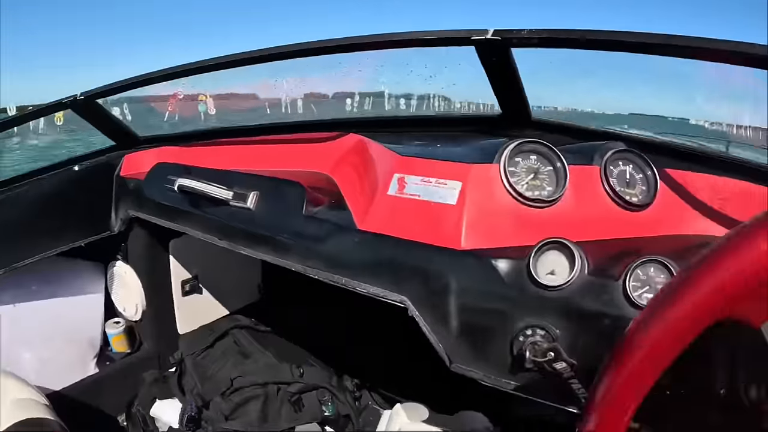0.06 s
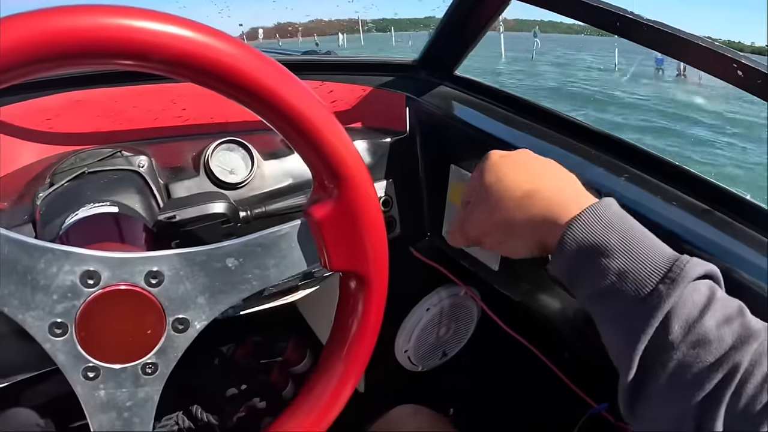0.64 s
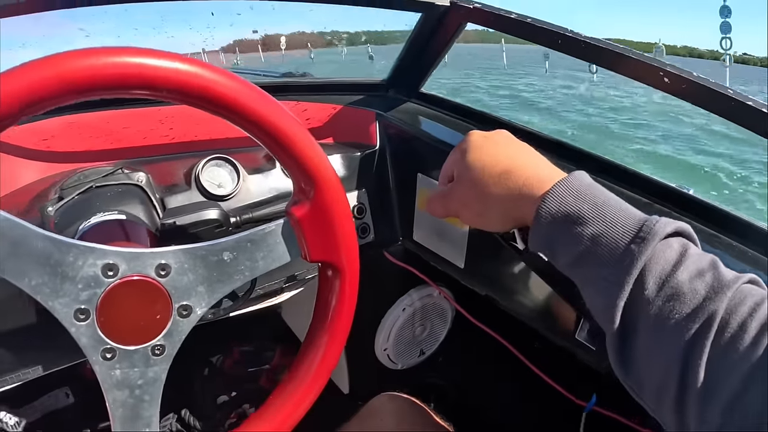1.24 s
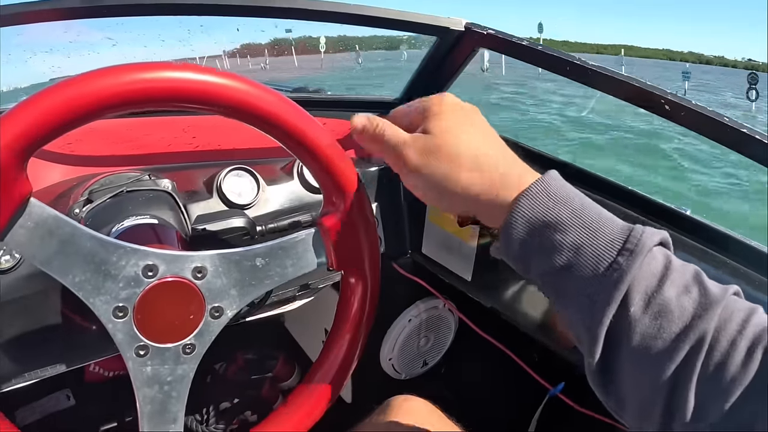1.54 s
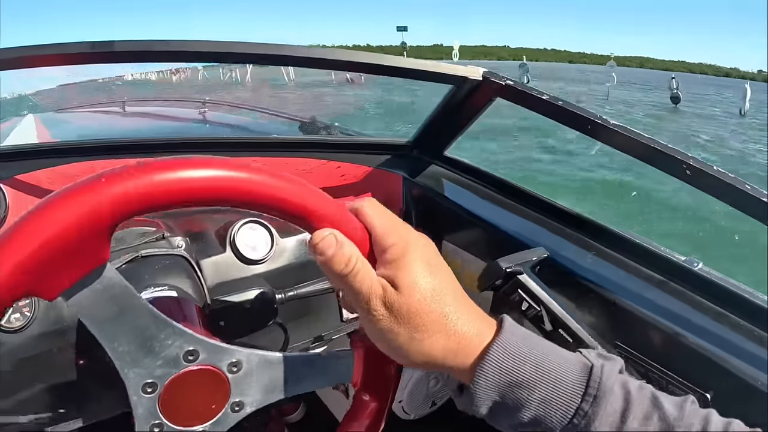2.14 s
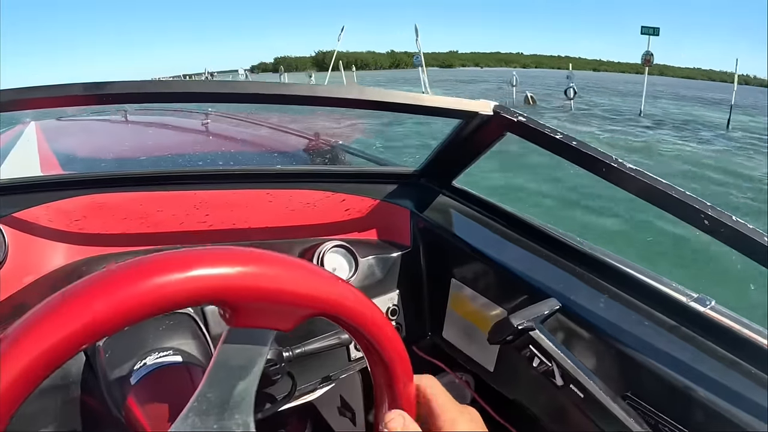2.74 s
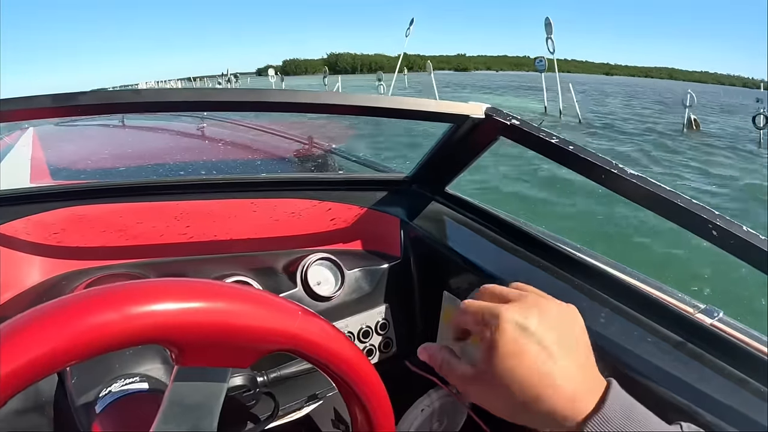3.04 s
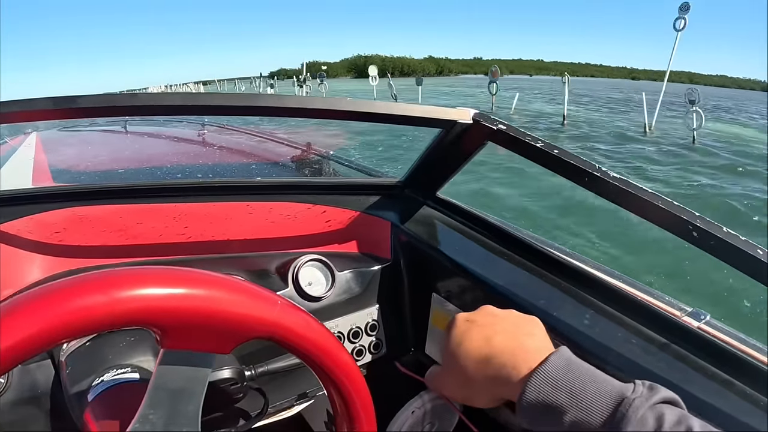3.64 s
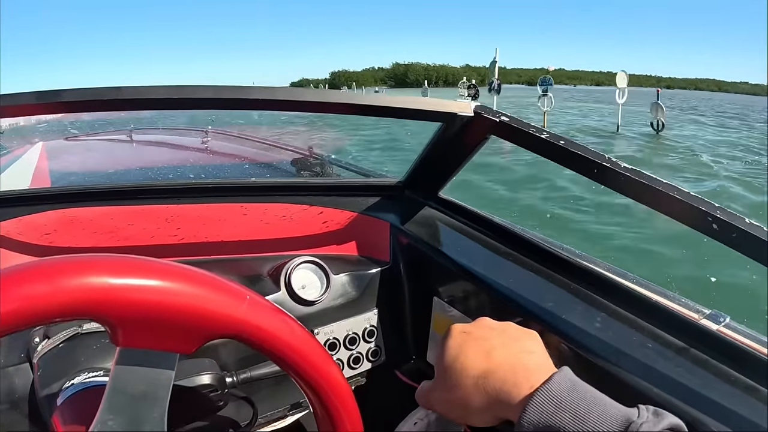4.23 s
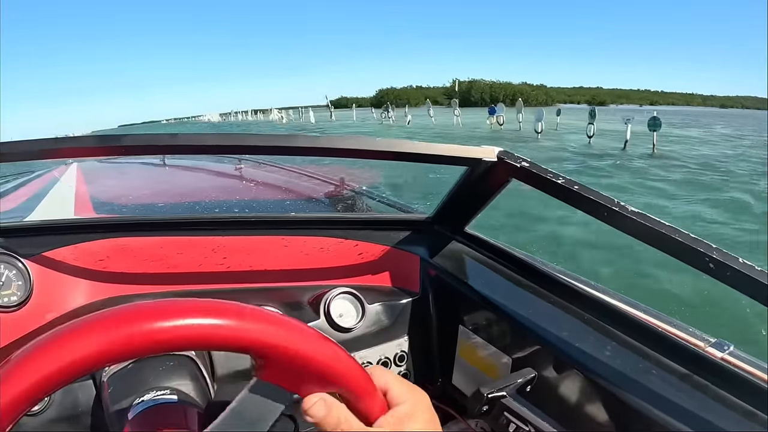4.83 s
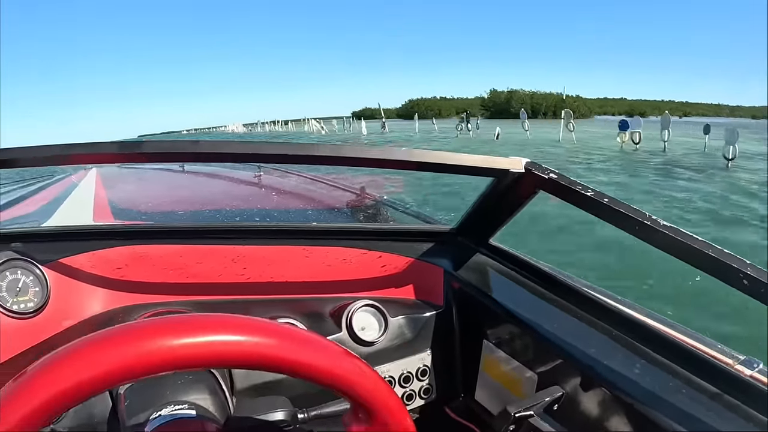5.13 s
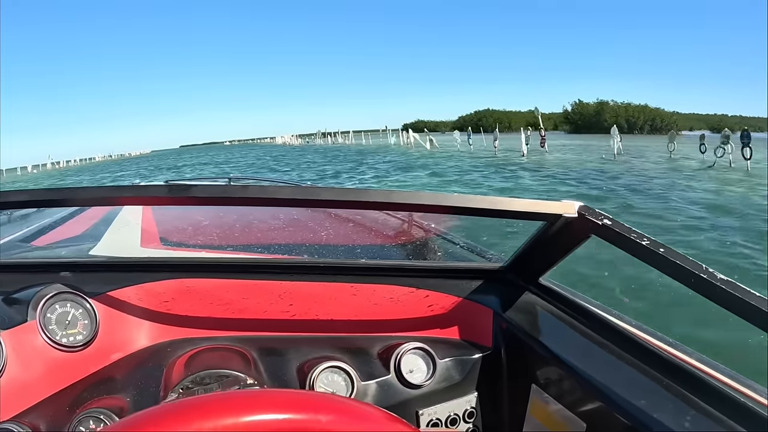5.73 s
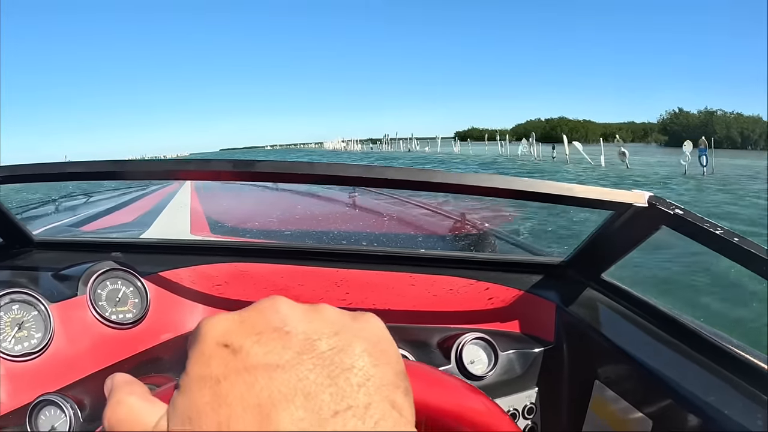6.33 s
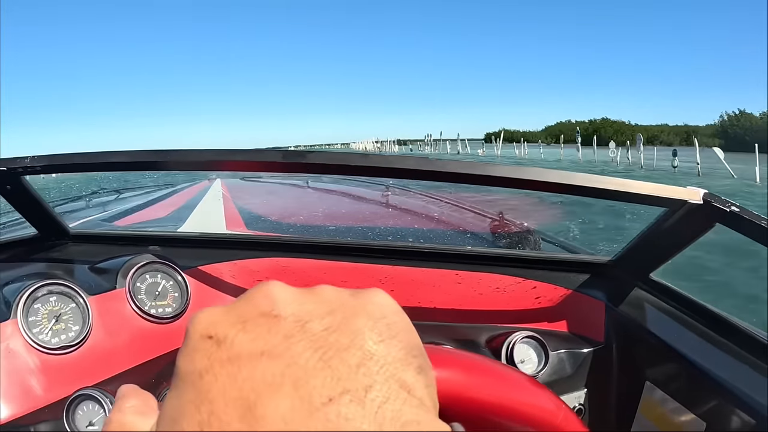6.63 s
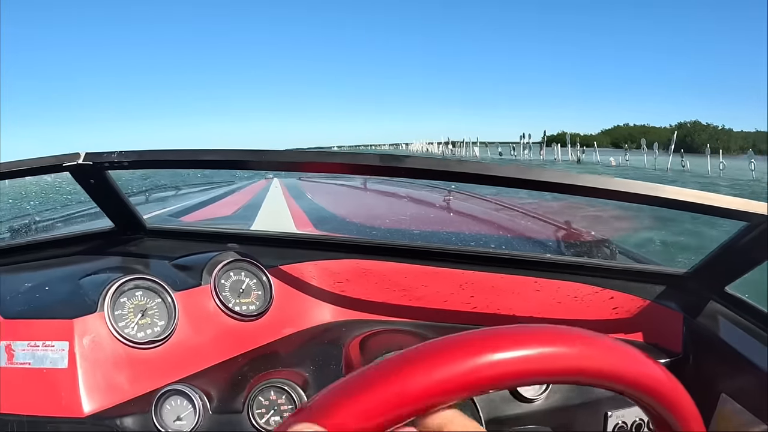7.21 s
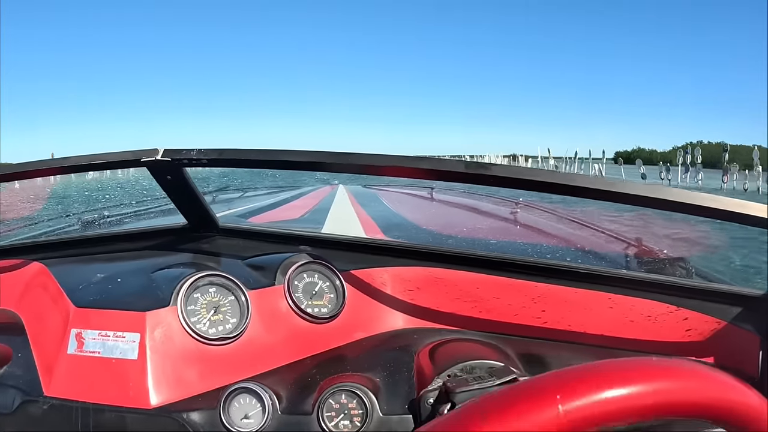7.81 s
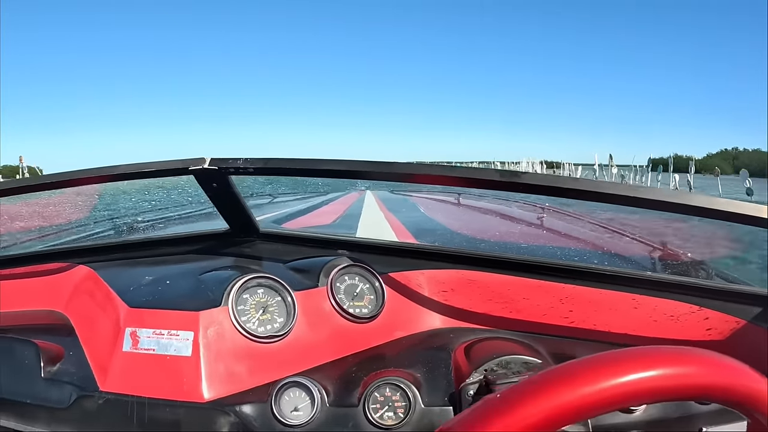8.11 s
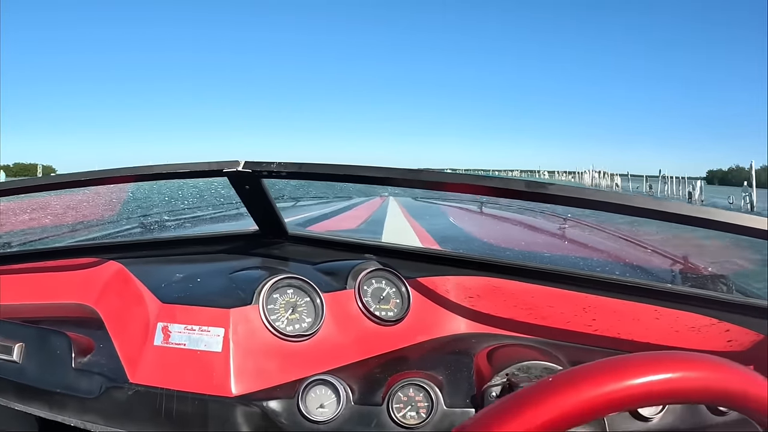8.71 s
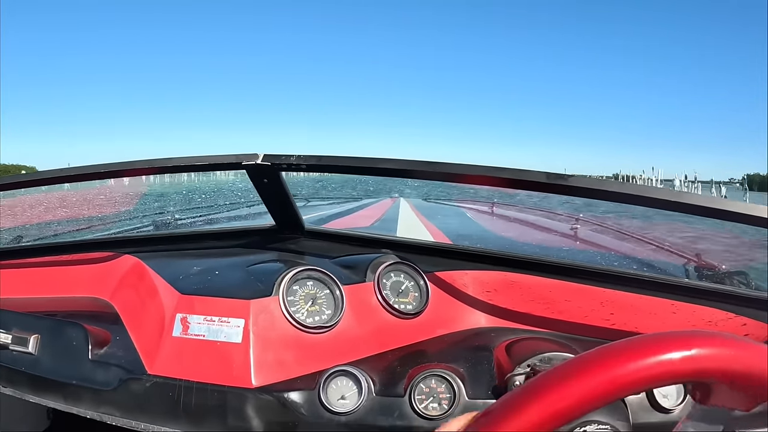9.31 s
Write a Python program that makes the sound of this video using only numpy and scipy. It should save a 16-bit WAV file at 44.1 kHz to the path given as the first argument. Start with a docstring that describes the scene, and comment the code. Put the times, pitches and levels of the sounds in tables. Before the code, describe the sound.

A small speedboat's outboard motor drones, revs briefly, then speeds up as wind buffets the microphone and the hull thumps through splashing waves.

```python
"""At the helm of a small speedboat. From the start the outboard motor drones astern, water rushes along
the hull and throws spray, and wind rumbles on the microphone. Near 1 s the motor is revved briefly;
from 2 s a thin sizzle comes and goes. At about 3.5 s and 4.2 s the throttle opens in two steps.
From 5.4 s steep waves knock on the hull and the wind tears at the microphone in short, crackling buffets.
The boat starts to plane (skim the water), and after 7 s its bow thumps into troughs amid splashes."""
import sys
import numpy as np
from scipy import signal
from scipy.io import wavfile
from scipy.ndimage import uniform_filter1d, minimum_filter1d

SR = 44100
rng = np.random.default_rng(int(sys.argv[2]) if len(sys.argv) > 2 else 0)


def log_audio(samples):
    """Write samples as a 16-bit WAV file to the path given in sys.argv[1]."""
    # one column per channel
    frames = np.atleast_2d(samples).T
    # limit to full scale, then quantise
    limited = np.clip(frames, -1, 1)
    pcm = np.round(limited * 32767).astype(np.int16)
    wavfile.write(sys.argv[1], SR, pcm)


N = 412776
TIME = np.arange(N) / SR
CRUISE_TURNS_PER_S = 56.45   # motor speed at the start
PLANING_S, HULL_NOTE_HZ = 5.69, 178

# loudness of the exhaust drone: time_s, level_db
DRONE_LEVELS = [(0.05, -14.5), (0.28, -14.5), (0.92, -14.5), (1.08, -18.5), (1.34, -13), (1.52, -15),
                (2.11, -13), (2.93, -16.5), (4.25, -15), (4.3, -14), (5.2, -15), (5.92, -19.5), (6.57, -17),
                (9.3, -21)]
# tone colour of fine drops: pitch_hz, level_db
DROP_SPECTRUM = [(3000, -2.5), (4500, 1), (5900, -1), (6800, -6), (8100, -9), (8900, -20), (10000, -16.5),
                 (11200, -25), (14000, -38)]


def from_db(db):
    """Turn decibels into a gain."""
    return 10 ** (np.asarray(db) / 20)


def unit_power(x):
    """Scale a signal to an average power of 1."""
    return x / np.sqrt(np.mean(x ** 2) + 1e-20)


def in_time(points):
    """Read a curve of (time, value) points at every sample."""
    return np.interp(TIME, *np.transpose(points))


def at_hz(spectrum, hz):
    """Read a spectrum's level at a pitch, sliding between its points on a musical scale."""
    pitches, levels = np.transpose(spectrum)
    return np.interp(np.log(hz), np.log(pitches), levels)


def drift(rate_hz):
    """A smooth random wander, typically about 1 in size."""
    step, warm_up = 40, 2000
    pole = np.exp(-2 * np.pi * rate_hz * step / SR)
    noise = rng.standard_normal(N // step + warm_up + 2)
    slow = signal.lfilter([1], [1, -2 * pole, pole * pole], noise)[warm_up:]
    return np.interp(np.arange(N) / step, np.arange(len(slow)), unit_power(slow))


def hiss():
    """White noise."""
    return rng.standard_normal(N)


def grainy_hiss(share, per_s, spread_db):
    """Hiss mixed with random tiny impacts, mostly small and a few large."""
    sizes = from_db(spread_db * np.minimum(rng.exponential(1, N), 4))
    hits = rng.random(N) < per_s / SR
    return hiss() + share * unit_power(hits * sizes * rng.choice([-1, 1], N))


def coloured(source, spectrum, flicker_db):
    """Shape noise to a spectrum with 14 bands, each flickering on its own; the result has power 1."""
    edges = np.geomspace(spectrum[0][0], min(spectrum[-1][0], .45 * SR), 15)
    noises, out = [source(), source()], 0
    for k, (low, high) in enumerate(zip(edges, edges[1:])):
        band = signal.sosfilt(signal.butter(2, [low, high], "band", fs=SR, output="sos"), noises[k % 2])
        out += band * from_db(at_hz(spectrum, np.sqrt(low * high)) + flicker_db * drift(30))
    return unit_power(out)


def tone(angle, level_db, shake_db, shake_hz):
    """One tone of the motor; it trembles because the fuel burns unevenly."""
    return np.sqrt(2) * from_db(level_db + shake_db * drift(shake_hz)) * np.cos(angle)


def swells(events, rise_s, fall_s):
    """A loudness curve that rises quickly at each (time, level) event and falls away."""
    out = np.zeros(N)
    for time_s, level_db in events:
        age = np.maximum(TIME - time_s + rise_s / 2, 0)
        out += from_db(level_db) * (1 - np.exp(-age / rise_s)) * np.exp(-age / fall_s)
    return out


def cockpit(x):
    """Hard panels close by add very short echoes that colour the sound."""
    # windscreen, side panel and dashboard: delay_s, gain
    echoes = [(.0029, .13), (.0047, -.13), (.0083, .14)]
    return x + sum(gain * np.interp(TIME - delay_s, TIME, x, left=0) for delay_s, gain in echoes)


def motor_speed():
    """Turns per second: the motor glides to each new speed, then creeps faster as the hull planes."""
    # changes in motor pitch (the rev, two steps up, small rises and sags):
    # start_s, target_turns_per_s, lag_s
    pitch_changes = [(0.1, 56.95, 0.03), (0.36, 56.1, 0.04), (0.775, 79.081, 0.061), (1.149, 59.867, 0.086),
                     (1.652, 58.144, 0.097), (2.274, 56.15, 0.113), (3.12, 55.6, 0.04),
                     (3.462, 63.288, 0.064), (4.183, 71.813, 0.068)]
    speed = CRUISE_TURNS_PER_S + .578 * np.maximum(TIME - PLANING_S, 0)
    before = CRUISE_TURNS_PER_S
    for start_s, target, lag_s in pitch_changes:
        lags = np.maximum(TIME - start_s, 0) / lag_s
        speed += (target - before) * (1 - (1 + lags) * np.exp(-lags))
        before = target
    return speed + .1725 * drift(4.23)   # choppy water tugs at the propeller


def exhaust(crank, speed):
    """Six firings a turn make the drone; uneven cylinders add a tone on each side, so it throbs."""
    # side tones against the firing tone: speed_turns_per_s, lower_db, upper_db
    side_tones = [(55.5, -14, -5), (56.6, -8.5, -4.5), (58, -8, -6.5), (63, -7, -3), (71.5, -9.5, -14.5),
                  (72.7, -6.5, -11.5), (73.5, -2, -4), (79, -5, -6)]
    speeds, *sides = np.transpose(side_tones)
    lower_db, upper_db = (np.interp(speed, speeds, side) for side in sides)
    total_power = 1 + from_db(lower_db) ** 2 + from_db(upper_db) ** 2
    firing_db = in_time(DRONE_LEVELS) - 10 * np.log10(total_power)
    out = tone(6 * crank, firing_db - .2, shake_db=.7, shake_hz=22)
    lag = np.pi / 5   # the ringing exhaust shifts the side tones, which softens the throb
    for multiple, side_db in ((5, lower_db), (7, upper_db)):
        angle = multiple * crank - lag + .025 * drift(3.1)
        out += tone(angle, firing_db + side_db, shake_db=1.85, shake_hz=2.1)
    return out


def hull_hum(crank, speed):
    """The hull carries the motor's four lowest tones to the seat, a quarter turn late."""
    # how well hull and cockpit carry each pitch: pitch_hz, level_db
    hull = [(55, -28), (68, -26.5), (73, -26), (78, -16), (100, -42.5), (115, -26.5), (126, -27.5),
            (134, -37), (150, -48.5), (225, -48), (284, -29.5), (290, -37), (315, -18.5)]
    drone_db = in_time(DRONE_LEVELS)
    swing_db = .57 * (drone_db - drone_db.mean()) - 1   # partly follows the drone
    out = np.zeros(N)
    for multiple in range(1, 5):
        angle = multiple * (crank - np.pi / 2) + .64 * drift(2.4)
        out += tone(angle, at_hz(hull, multiple * speed) + swing_db, shake_db=2.5, shake_hz=4.3)
    return out


def overtones(crank, speed, load_db, fast, strain):
    """High multiples of the motor speed swell as they pass pitches where exhaust and motor cover ring."""
    # how well exhaust and cover carry each pitch: pitch_hz, level_db
    cover = [(450, -33.5), (510, -39.5), (570, -49.5), (640, -48.5), (700, -40), (780, -40.5), (870, -49.5),
             (1010, -59), (1240, -52.5), (1330, -64.5), (1600, -67.5), (1850, -64), (2700, -78.5)]
    # tones the firing pattern favours or weakens: multiple -> accent_db, fast_db, strained_db, planed_db
    accents = {8: (0, -4, -7, 6), 9: (-6, 3, -6, -2), 10: (0, 0, 4, 0), 11: (-3, 4, -3, -5),
               12: (5.5, -1, -2, 2), 13: (3.5, 0, 9.5, 2), 14: (0, -2, 6, -5), 15: (-10, 10, 3, 7),
               16: (-1, 2, -2, -1), 18: (5, -3, -9, 3), 20: (-1, 2, -7, -2), 22: (-2, 4, 2, 3),
               24: (-1, 0, -3, 6)}
    overall_db = load_db + .5 - .18 * (speed - CRUISE_TURNS_PER_S)
    planed = np.clip(TIME - PLANING_S, 0, 1)
    out = np.zeros(N)
    for multiple in range(8, 37):
        sway_db = 2.2 * drift(.6) * min(multiple / 20, 1)
        accent_db, fast_db, strained_db, planed_db = accents.get(multiple, (0, 0, 2, .69))
        pattern_db = accent_db + fast_db * fast + strained_db * strain + planed_db * planed
        level_db = at_hz(cover, multiple * speed) + pattern_db + overall_db + sway_db
        if multiple * speed[-1] > 850:   # tones that end above 850 Hz grow as the hull planes
            level_db += 3.2 * planed
        scatter = rng.uniform(0, 2 * np.pi) * (multiple > 12)   # lower tones keep in step as one pulse
        jolts = .18 * drift(14)   # uneven burning shakes the timing
        out += tone(multiple * crank + scatter + jolts, level_db, shake_db=2.4, shake_hz=15)
    return out


def propeller(crank, speed, bite_db):
    """The blades hum louder as they bite the water, and thin out with speed."""
    blades_per_turn = 2.48
    level_db = -23.3 + 1.1 * bite_db - .75 * (speed - CRUISE_TURNS_PER_S)
    return tone(blades_per_turn * crank + .099 * drift(2), level_db, shake_db=2.5, shake_hz=2.1)


def gear_whine(crank, speed):
    """Gear teeth meet many times a turn and whine through their case."""
    # how well the case carries each pitch: pitch_hz, level_db
    gear_case = [(1050, -41), (1075, -43.5), (1110, -55), (1200, -51), (1300, -58), (1375, -60),
                 (1397, -49), (1440, -54), (1495, -43)]
    teeth = 19
    angle = teeth * crank + .16 * drift(3.1)
    return tone(angle, at_hz(gear_case, teeth * speed), shake_db=-.5, shake_hz=8.4)


def rasp(crank, bite_db, fast, strain):
    """Moving parts rasp under the motor cover, much louder under load and throbbing more at speed."""
    # tone colour of the rasp: pitch_hz, level_db
    spectrum = [(500, -5), (850, -1.5), (1200, 6.5), (1550, -1.5), (2100, -6), (2800, -8), (3600, -21),
                (6000, -25.5)]
    throb = 1 + .12 * (1 + fast) * np.cos(crank)
    level_db = -50.5 + 2 * bite_db + 14 * strain
    return coloured(hiss, spectrum, flicker_db=1) * throb * from_db(level_db)


def motor():
    """One turning crankshaft drives every sound of the outboard; at the top of the rev it strains."""
    # how hard the propeller bites: time_s, level_db
    bite_levels = [(0, -0.5), (.75, -2.5), (3.3, -2.5), (4.3, 1), (5.3, 2.5), (6.6, -7.5), (8.4, 2),
                   (9.36, 2)]
    strain_turns_per_s, strain_lag_s = 73.8, .019
    speed, bite_db = motor_speed(), in_time(bite_levels)
    overspeed = np.maximum(np.interp(TIME - strain_lag_s, TIME, speed) - strain_turns_per_s, 0)
    load_db = bite_db + 2.5 * overspeed
    strain = overspeed / overspeed.max()
    fast = np.interp(speed, (64, 72), (0, 1))   # fades in the high-speed sound
    crank = 2 * np.pi * np.cumsum(speed) / SR + .008 * drift(18)   # shaft angle in radians
    machinery = propeller(crank, speed, bite_db) + gear_whine(crank, speed)
    machinery += cockpit(rasp(crank, bite_db, fast, strain))
    drone = exhaust(crank, speed) + hull_hum(crank, speed)
    return machinery + drone + overtones(crank, speed, load_db, fast, strain)


def wash():
    """Water washes dully under the hull."""
    # loudness of the wash: time_s, level_db
    levels = [(0, -24), (.6, -24), (1.1, -21), (1.6, -25.5), (2.8, -27.5), (4.2, -26.5), (5.4, -26),
              (6.5, -33.5), (7.2, -25.5), (7.8, -29), (8.4, -23.5), (9.36, -25)]
    # its tone colour: pitch_hz, level_db
    spectrum = [(70, -4.5), (145, 6.5), (220, 2.5), (370, 3.5), (470, 4.5), (570, -19), (780, -8.5),
                (1100, -20), (2000, -37)]
    return coloured(hiss, spectrum, flicker_db=3) * from_db(in_time(levels))


def rush_and_spray():
    """Water churns beside the hull and sprays off the bow; both surge and leap as waves slap the boat."""
    # rise and fall of the spray: time_s, level_db
    spray_levels = [(0.0, -47.5), (0.27, -49.5), (0.5, -58), (1.67, -57), (2.82, -54.5), (3.55, -59),
                    (4.3, -59.5), (5.11, -55), (6.02, -53), (6.6, -56), (7.1, -53.5), (7.95, -51),
                    (8.65, -53), (9.36, -49.5)]
    # the hull meets a wave: time_s, level_db
    slaps = [(0.244, -31), (2.759, -37.5), (5.415, -33), (7.139, -26.5), (7.497, -32), (7.569, -27),
             (7.595, -33), (7.721, -28), (7.92, -25.5), (8.334, -31), (8.373, -26.5), (8.456, -24),
             (8.52, -29.5), (8.655, -23.5), (8.71, -32), (8.877, -33), (8.947, -23.5), (9.227, -22),
             (9.314, -26)]
    # tone colours of the rush and the spray: pitch_hz, level_db
    rush_spectrum = [(300, 4), (600, 13), (850, 4.5), (1200, 2.5), (1800, -2), (2300, -9), (3200, -8.5),
                     (5000, -37.5)]
    spray_spectrum = [(1500, -11), (3000, 2), (3800, 1), (4700, -6.5), (5800, -12), (7500, -22),
                      (9000, -32), (11000, -40.5), (15000, -62.5)]
    spray_db, surge = in_time(spray_levels), drift(20)
    rush_db = -41 + spray_db - spray_db.mean()
    thrown = swells(slaps, rise_s=.007, fall_s=.014)
    rush = coloured(lambda: grainy_hiss(.88, per_s=1500, spread_db=5), rush_spectrum, flicker_db=2)
    spray = coloured(lambda: grainy_hiss(.7, per_s=2500, spread_db=3.5), spray_spectrum, flicker_db=1)
    rush *= from_db(rush_db + .35 * surge) + from_db(3.5) * thrown
    spray *= from_db(spray_db - 2 + 2.1 * surge) + from_db(-26) * thrown
    return rush + spray


def wind_rumble():
    """Swirling air rumbles steadily on the microphone."""
    # loudness of the rumble: time_s, level_db
    levels = [(0, -16), (.5, -18.5), (1.7, -15.5), (3.0, -17), (3.9, -14.5), (5.4, -14), (5.8, -19.5),
              (6.5, -16.5), (9.36, -16)]
    # its tone colour: pitch_hz, level_db
    spectrum = [(12, -4.5), (24, 5.5), (45, -5), (70, -7.5), (100, -12), (160, -33), (300, -35),
                (600, -72.5)]
    return coloured(hiss, spectrum, flicker_db=1.5) * from_db(in_time(levels))


def fizz_and_splashes():
    """Fine drops fizz all the time, and thrown water patters back on the sea in bright bursts."""
    # loudness of the fizz: time_s, level_db
    fizz_levels = [(0, -51), (.3, -74), (.5, -67), (1.4, -70.5), (2.1, -63), (2.9, -62.5), (3.5, -70.5),
                   (4.4, -70.5), (5.3, -62.5), (6.25, -66), (6.5, -66.5), (7.3, -63), (7.7, -67.5),
                   (9.36, -60)]
    # thrown water lands: time_s, level_db
    landings = [(1.51, -60), (2.755, -61), (4.84, -62), (5.1, -62), (6.6, -57.5), (6.72, -62), (7.05, -62),
                (7.135, -59), (7.18, -59), (7.32, -58.5), (7.49, -61.5), (7.56, -54.5), (7.625, -64),
                (7.71, -59), (7.745, -56), (7.82, -59), (7.925, -58), (8.04, -59), (8.14, -62), (8.22, -63),
                (8.3, -59), (8.395, -54.5), (8.47, -60), (8.648, -60), (8.695, -56), (8.845, -60),
                (8.945, -65), (9.13, -55), (9.31, -57)]
    drops = coloured(lambda: grainy_hiss(1.3, per_s=700, spread_db=5), DROP_SPECTRUM, flicker_db=2)
    fizz = from_db(in_time(fizz_levels) + 1.5 * drift(20))
    splashes = from_db(7) * swells(landings, rise_s=.009, fall_s=.026)
    return drops * (fizz + splashes)


def sizzle():
    """A thin sizzle, made of a narrow band of hiss, comes and goes."""
    # spells of sizzling: start_s, end_s, level_db
    spells = [(2.0, 2.5, -68), (4.58, 5.05, -69.5), (5.05, 6.35, -66.5)]
    pitch_hz, width_hz, fade_s = 5500, 180, .06
    pole, angle = np.exp(-np.pi * width_hz / SR), 2 * np.pi * pitch_hz / SR
    narrow = unit_power(signal.lfilter([1, 0, -1], [1, -2 * pole * np.cos(angle), pole * pole], hiss()))
    level = np.zeros(N)
    for start_s, end_s, level_db in spells:
        level += from_db(level_db) * np.clip(np.minimum(TIME - start_s, end_s - TIME) / fade_s, 0, 1)
    return narrow * level * from_db(2 * drift(25))


def hull_knocks():
    """Short, steep waves flex the hull for a cycle or two of its note before the water damps it."""
    # a wave strikes: start_s, level_db
    knocks = [(5.357, -7), (5.57, -13), (5.749, -11), (5.797, -12), (5.877, -14), (5.929, -15),
              (6.039, -16), (6.274, -16)]
    rise_s, out = .0035, np.zeros(N)
    for start_s, level_db in knocks:
        age = np.maximum(TIME - start_s, 0)
        swell = age / rise_s * np.exp(1 - age / rise_s)
        out += from_db(level_db) * swell * np.sin(2 * np.pi * HULL_NOTE_HZ * age)
    return out


def wind_buffets():
    """Whirls of air burst on the microphone with a crackle, a snap and a pop, then trail a dull flutter."""
    # each burst: peak_s, level_db, fade_s, snap_db
    buffets = [(5.488, -21, 0.0019, -56), (5.574, -25.5, 0.0094, -58), (5.744, -17, 0.0073, -29.5),
               (5.751, -22, 0.0025, -54), (5.873, -20.5, 0.013, -57), (5.929, -18.5, 0.0044, -40),
               (5.965, -20.5, 0.0057, -37), (5.997, -26, .003, -54), (6.012, -25, 0.01, -54),
               (6.042, -20, 0.003, -52), (6.117, -17, 0.0048, -31.5), (6.146, -22.5, .0018, -60),
               (6.279, -25, .009, -52)]
    # tone colours of the dull crackle and the bright snap: pitch_hz, level_db
    crackle_spectrum = [(60, 14), (200, 21.5), (700, 10), (1400, 5.5), (2300, -4), (3800, -14.5),
                        (6000, -37.5), (10000, -42), (15000, -62)]
    snap_spectrum = [(1500, -7), (3000, 10.5), (5000, -1), (7000, -11), (10000, -28.5), (14000, -41)]
    bursts, snaps, pops = np.zeros((3, N))
    for peak_s, level_db, fade_s, snap_db in buffets:
        away_s = np.abs(TIME - peak_s)
        bursts += from_db(level_db + 2.5) * np.exp(-away_s / fade_s)
        snaps += from_db(snap_db) * np.exp(-away_s / .0022)
        pops -= from_db(level_db + 10.5) * np.exp(-(away_s / .0011) ** 2)   # pressure dips at the core
    trails = swells([(s, db - 7.5) for s, db, _, _ in buffets], rise_s=.0014, fall_s=.053)
    crackle = coloured(lambda: grainy_hiss(.7, per_s=2500, spread_db=2.5), crackle_spectrum, flicker_db=1)
    crackle = signal.sosfilt(signal.butter(2, 5500, fs=SR, output="sos"), crackle)
    flutter = unit_power(signal.sosfilt(signal.butter(2, [80, 500], "band", fs=SR, output="sos"), hiss()))
    bright = coloured(hiss, snap_spectrum, flicker_db=1)
    return bursts * crackle + snaps * bright + pops + trails * flutter


def windscreen_ticks():
    """Single drops tick on the windscreen."""
    # a drop strikes: time_s, level_db
    ticks = [(6.305, -50), (7.572, -46), (8.406, -48), (8.666, -44)]
    return coloured(hiss, DROP_SPECTRUM, flicker_db=0) * swells(ticks, rise_s=.0002, fall_s=.002)


def bow_thumps():
    """The bow drops into troughs with a thud; the hull answers each with one deep, short note."""
    # the bow lands: start_s, level_db
    thumps = [(7.14, -30), (7.319, -25), (7.915, -32), (8.192, -31), (8.372, -18), (8.657, -21),
              (8.875, -17.5), (8.947, -20.5), (9.228, -18.5), (9.314, -17.5)]
    # tone colour of the thud: pitch_hz, level_db
    spectrum = [(110, 3), (190, -2), (300, -3.5), (550, -6.5), (850, -13), (1300, -19), (2000, -32)]
    out = coloured(hiss, spectrum, flicker_db=4.5) * swells(thumps, rise_s=.0026, fall_s=.033)
    for start_s, level_db in thumps:
        age = np.maximum(TIME - start_s, 0)
        swell = (1 - np.exp(-age / .004)) * np.exp(-age / .018)
        out += from_db(level_db + 6) * swell * np.sin(2 * np.pi * HULL_NOTE_HZ * age)
    return out


def scene():
    """Motor, water and wind as heard from the driver's seat."""
    steady = motor() + wash() + cockpit(rush_and_spray()) + wind_rumble() + fizz_and_splashes()
    passing = sizzle() + hull_knocks() + wind_buffets() + windscreen_ticks() + bow_thumps()
    return (steady + passing)[None]


def limiter(x, ceiling_db, reaction_s):
    """Turn the volume down smoothly around every peak that would pass the ceiling."""
    size = int(reaction_s * SR)
    allowed = np.minimum(1, from_db(ceiling_db) / (np.abs(x) + 1e-9))
    gain = minimum_filter1d(allowed, 2 * size)
    return x * uniform_filter1d(uniform_filter1d(gain, size), size)


def record(dry):
    """The microphone sheds the deepest rumble, a limiter holds the peaks and the highest treble is cut."""
    fades = np.clip(np.minimum(TIME, TIME[-1] - TIME) / .003, 0, 1)   # soft start and stop
    thinned = signal.sosfilt(signal.butter(2, 14, "high", fs=SR, output="sos"), dry * fades)
    held = limiter(thinned, ceiling_db=-2.5, reaction_s=.004)
    return signal.sosfilt(signal.cheby2(12, 70, 15600, fs=SR, output="sos"), held)


dry = scene()
out = record(dry)
log_audio(out)
```